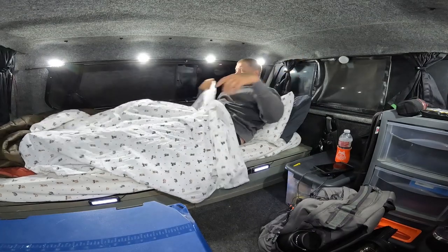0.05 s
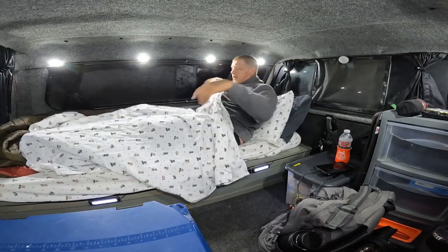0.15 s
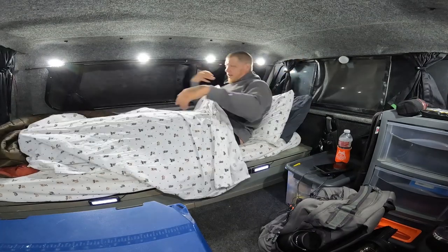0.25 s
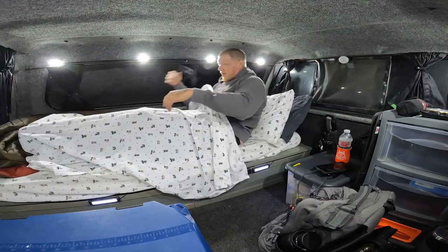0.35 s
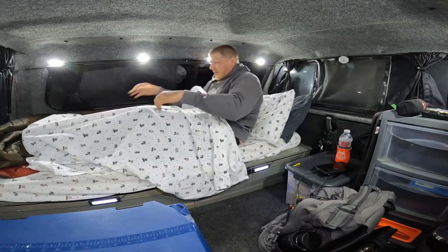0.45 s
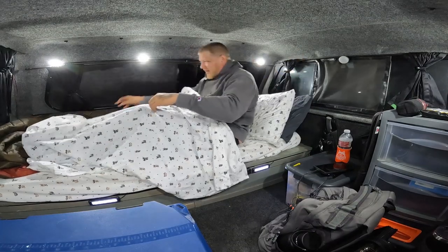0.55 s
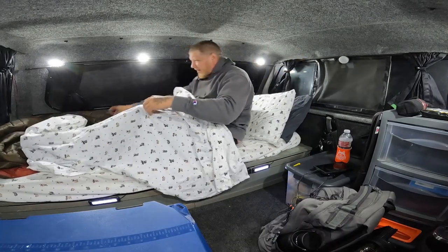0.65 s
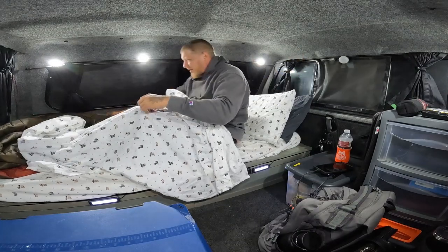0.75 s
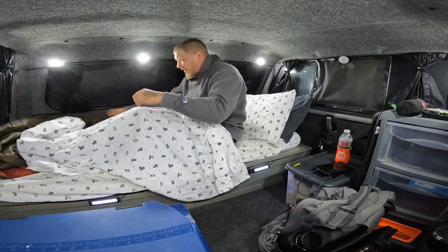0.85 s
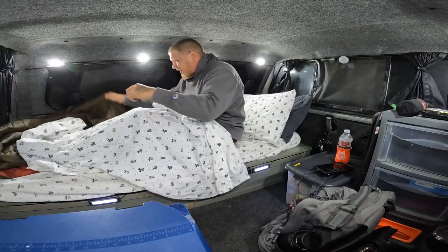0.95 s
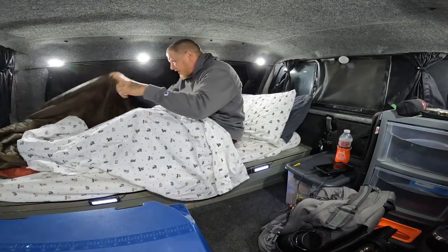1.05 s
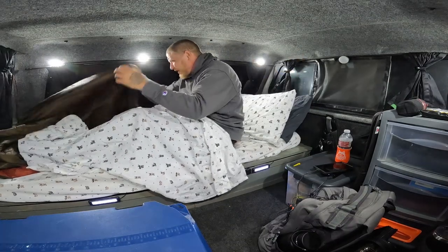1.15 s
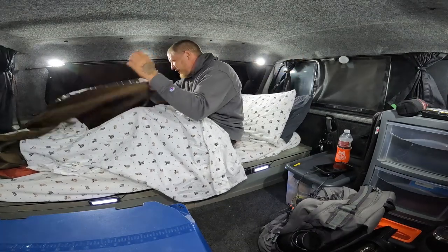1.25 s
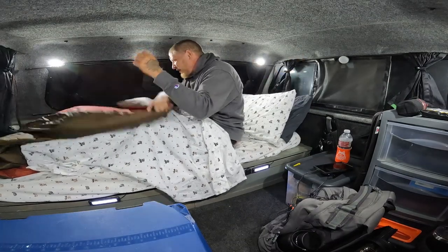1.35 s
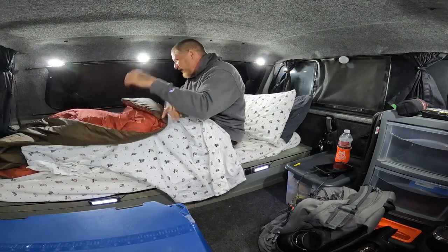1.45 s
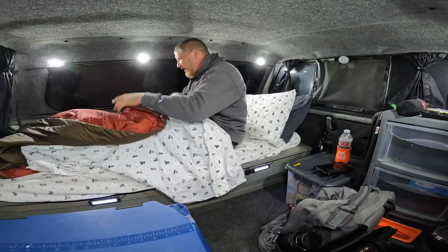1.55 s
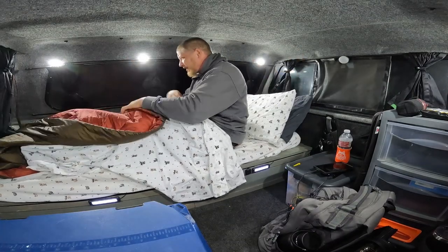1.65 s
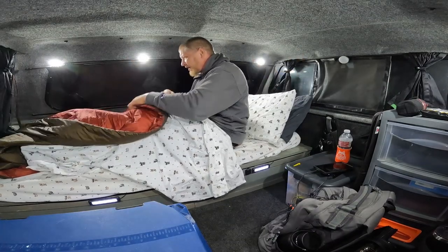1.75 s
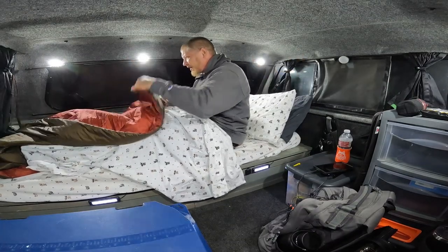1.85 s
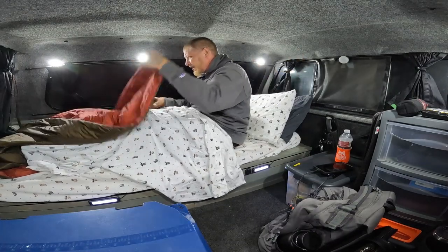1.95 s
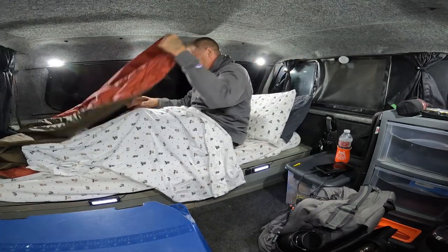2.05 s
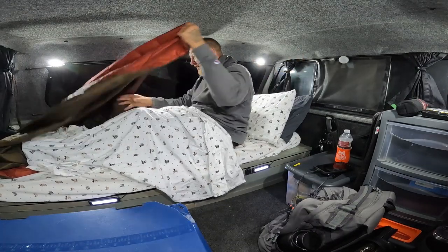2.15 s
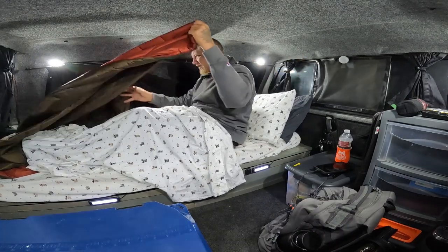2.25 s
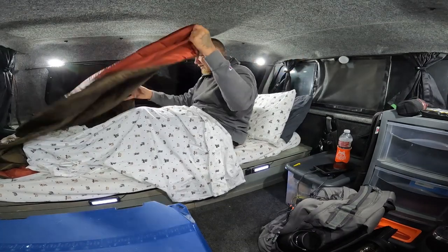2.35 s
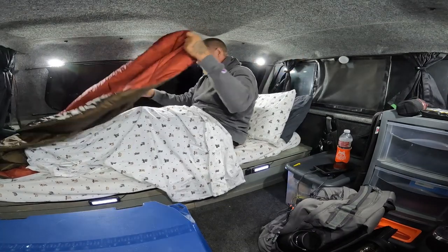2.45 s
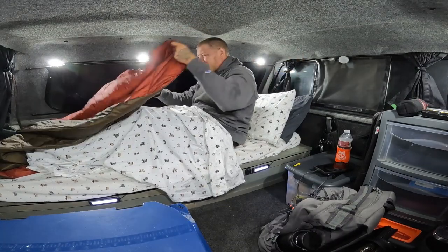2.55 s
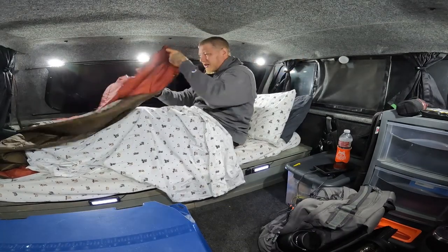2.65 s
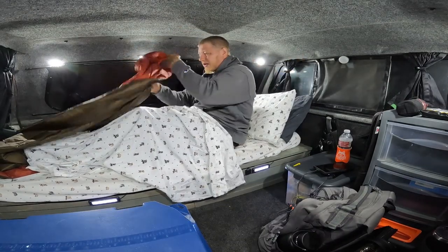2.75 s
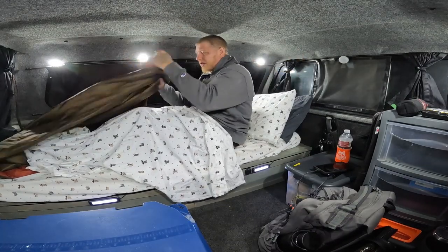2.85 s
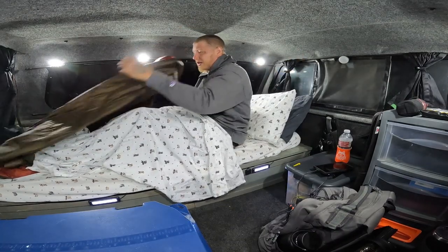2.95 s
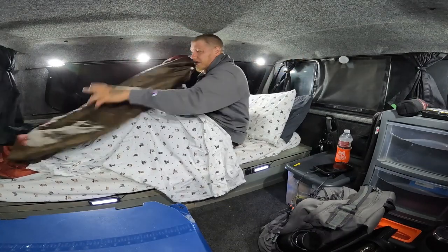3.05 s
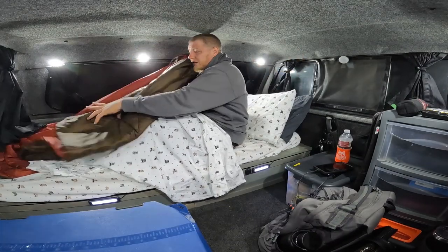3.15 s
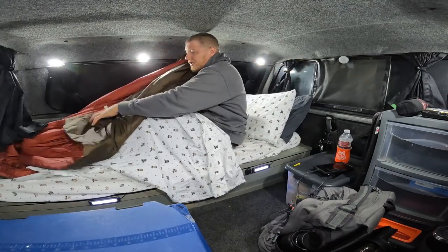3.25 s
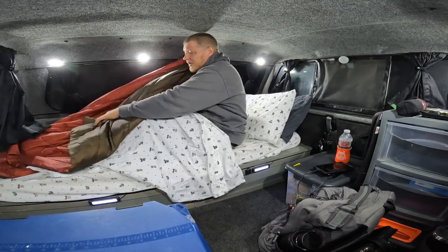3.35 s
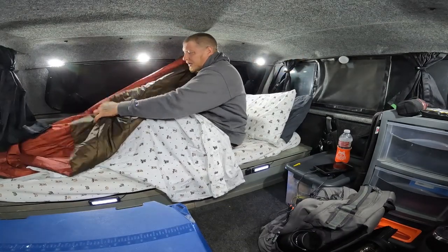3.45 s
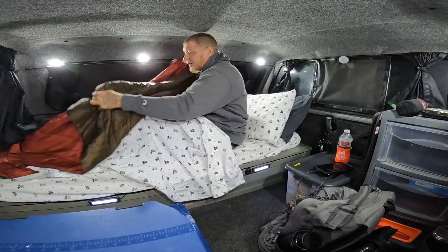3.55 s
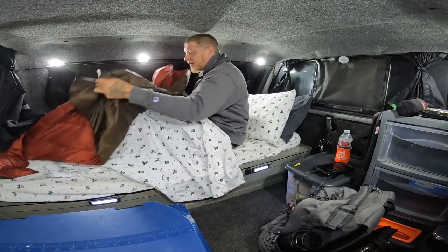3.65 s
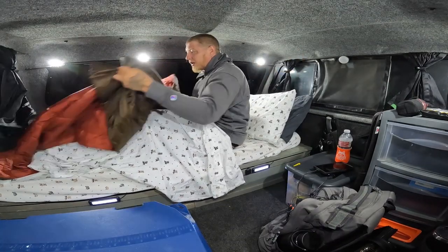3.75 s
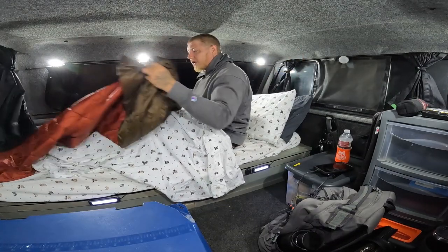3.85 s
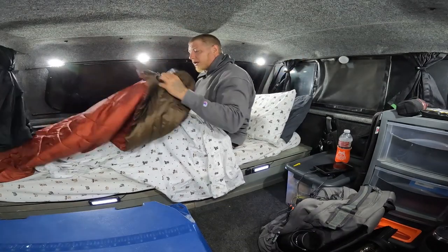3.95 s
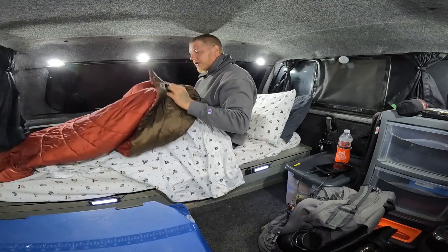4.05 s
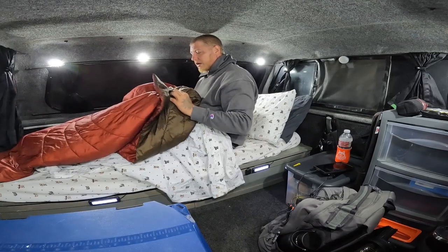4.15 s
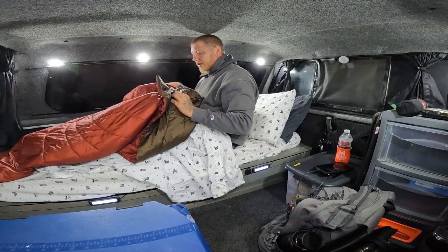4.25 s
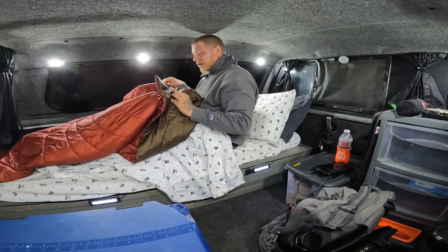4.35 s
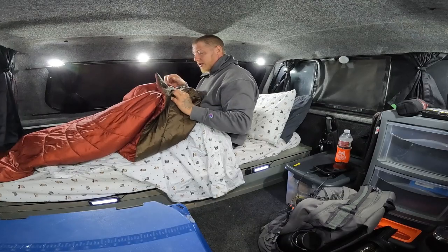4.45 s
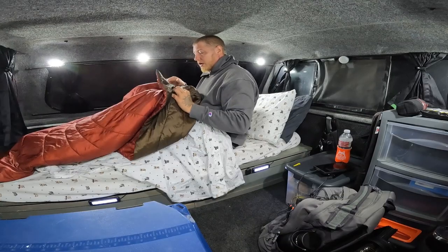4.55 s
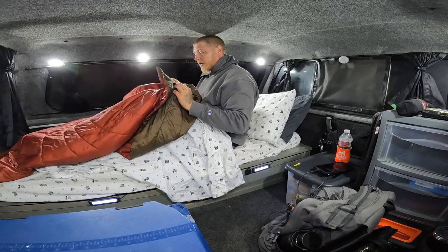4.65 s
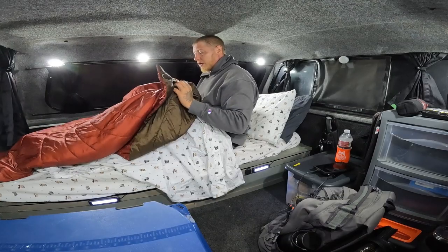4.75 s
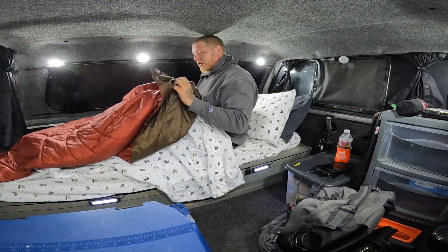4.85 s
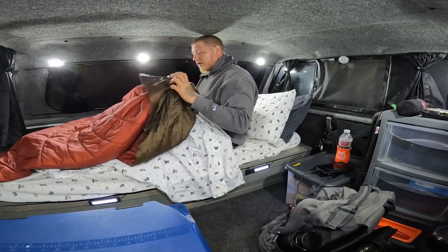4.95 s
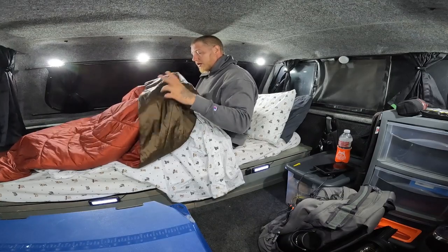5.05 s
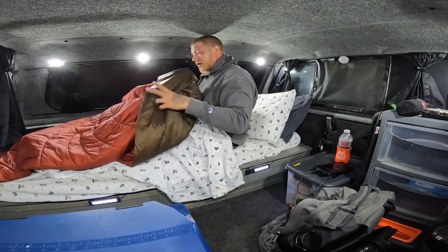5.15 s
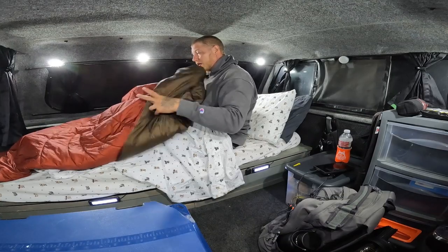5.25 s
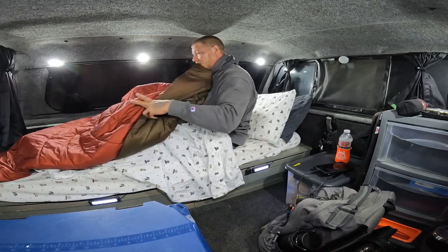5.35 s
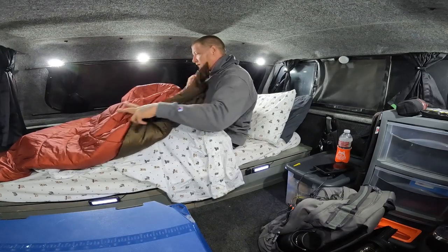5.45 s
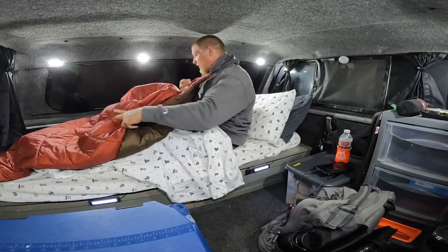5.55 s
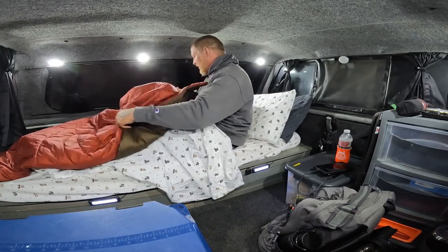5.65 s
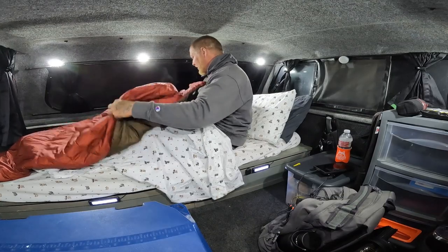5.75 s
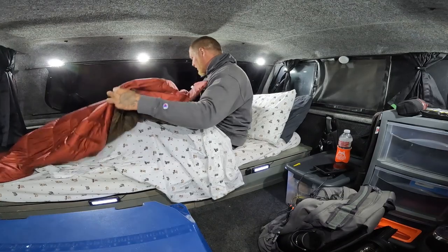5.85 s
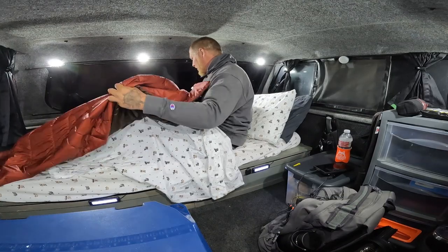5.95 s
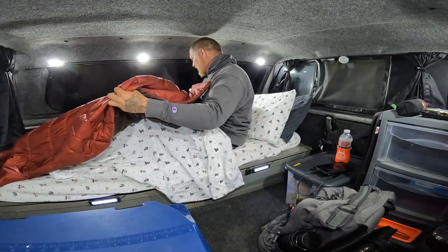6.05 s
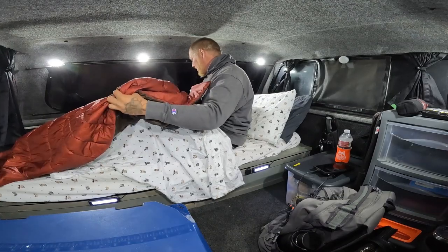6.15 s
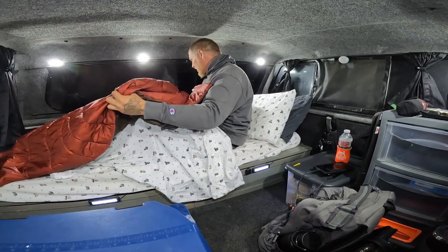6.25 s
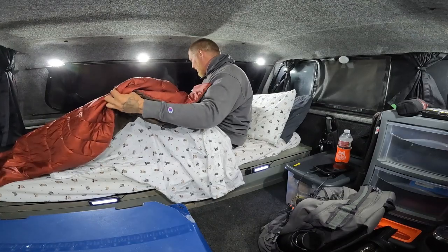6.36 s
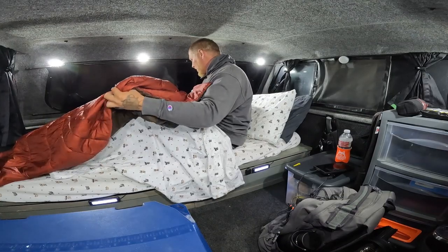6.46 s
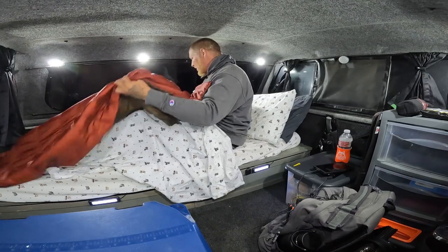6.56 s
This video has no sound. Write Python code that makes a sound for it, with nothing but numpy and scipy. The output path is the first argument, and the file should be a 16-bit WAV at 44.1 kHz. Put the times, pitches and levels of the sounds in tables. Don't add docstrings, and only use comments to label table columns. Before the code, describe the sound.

Slippery bag fabric rustles, snaps and flaps close by, with dull knocks on a wooden bed and low puffs of pushed air, easing then resuming.

```python
import sys
import numpy as np
from scipy import signal
from scipy.fft import rfft, irfft
from scipy.io import wavfile

SR = 44100
rng = np.random.default_rng(int(sys.argv[2]) if len(sys.argv) > 2 else 0)


def gain_from_decibels(decibels):
    exponent = np.asarray(decibels, float) / 20
    return 10 ** exponent


def persist_wave(psi):
    counts = np.round(np.clip(psi, -1, 1) * 32767).astype(np.int16)
    wavfile.write(sys.argv[1], SR, np.atleast_2d(counts).T)


N = 291060


def to_rms_one(x):
    return x / np.sqrt(np.mean(x ** 2) + 1e-20)


def to_peak_one(x):
    return x / np.abs(x).max(axis=1, keepdims=True)


def at_hz(points, hz):
    points_hz, values = np.array(points)[:, 0], np.array(points)[:, 1]
    return np.interp(np.log(hz), np.log(points_hz), values)


def drift(rate):
    r = np.exp(-80 * np.pi * rate / SR)
    slow = signal.lfilter([1], [1, -2 * r, r * r], rng.standard_normal(N // 40 + 2002))[2000:]
    return np.interp(np.arange(N) / 40, np.arange(len(slow)), to_rms_one(slow))


def ring(x, hz, t60):
    r, w = gain_from_decibels(-60 / (t60 * SR)), 2 * np.pi * hz / SR
    return signal.lfilter([0, np.sin(w)], [1, -2 * r * np.cos(w), r * r], x + 1e-18)


def band(x, low_hz, high_hz, order=2):
    sos = signal.butter(order, [low_hz, min(high_hz, .45 * SR)], "band", fs=SR, output="sos")
    return signal.sosfilt(sos, x)


def swells(peak_s, rise_s, fall_s, level_db, curve=2):
    swell_db, rest_db = 12, -88
    t = np.arange(0, N / SR + .003, .003)
    late = t[:, None] - peak_s
    rising, falling = -late / np.maximum(rise_s, .005), late / np.maximum(fall_s, .005)
    shape_db = -swell_db * np.where(late < 0, rising, falling) ** curve
    power = np.sum(gain_from_decibels(2 * np.maximum(level_db + shape_db, -150)), axis=1) + gain_from_decibels(2 * rest_db)
    return np.interp(np.arange(N) / SR, t, 10 * np.log10(power))


# pitch_hz, likeness (1 = the same)
LIKENESS = [(150, .995), (300, 0.97), (600, 0.72), (1200, 0.83), (2400, 0.64), (5000, 0.79), (9000, 0.67),
            (14000, 0.18)]
# pitch_hz, left_minus_right_db
LEAN = [(150, -0.5), (550, 3.5), (1200, 1.8), (2400, 3.5), (5000, 2), (9000, 4.5), (14000, 9)]


def ports(mid, side, hz):
    alike = np.clip(at_hz(LIKENESS, hz), -1, 1)
    lean = gain_from_decibels(at_hz(LEAN, hz) / 2 * np.array([[1], [-1]]))
    return lean * (np.sqrt(1 + alike) * mid + np.sqrt(1 - alike) * side * [[1], [-1]]) / np.sqrt(2)


def coloured(source, spectrum, low_hz, count, moving_db):
    out = 0
    edges = low_hz * 2 ** (np.arange(count + 1) / 3)
    for k, (low, high) in enumerate(zip(edges, edges[1:])):
        hz = np.sqrt(low * high)
        level = gain_from_decibels(at_hz(spectrum, hz) + moving_db(hz))
        out = out + level * ports(*band(source[k % 2], low, high), hz)
    return out


# pitch_hz, level_db (per Hz)
HISS = [(100, 0), (150, 13), (356, 3), (615, -36), (1400, 11), (2600, -5), (6200, 5.5), (12000, -10),
        (14000, -32)]


def cabin_hiss():
    noise = rng.standard_normal((2, 2, N))
    return gain_from_decibels(-69) * to_rms_one(coloured(noise, HISS, 61.0, count=24, moving_db=lambda hz: 0))


# widest_s, dying_s, cabin_breathing_db, shell_flex_db (against the breathing)
SWINGS = [(0.07, 0.17, -40.5, -13), (0.19, 0.38, -65, 14), (0.35, 0.13, -40, -26),
          (0.71, 0.29, -44.5, -25.5), (0.81, 0.32, -61, 11), (0.98, 0.072, -37, -28),
          (1.24, 0.15, -29, -16), (1.392, 0.11, -71.5, 17), (1.53, 0.12, -41, -3.5),
          (1.79, 0.12, -39.5, -2), (1.88, 0.57, -61, -4), (2.2, 0.21, -37, -9), (2.72, 0.06, -59.5, 6),
          (3.04, 0.71, -48, -9), (3.41, 0.11, -39, -1), (3.72, 0.24, -47, 2.5), (3.782, 0.18, -31.5, -29),
          (4.05, 0.083, -40.5, -39), (4.201, 0.3, -64.5, -8), (4.75, 0.24, -57.9, -11.5),
          (4.86, 0.063, -54.5, -6), (5.09, 0.096, -52, -18), (5.36, 0.16, -47, -9), (5.55, 0.14, -74, 17),
          (5.74, 0.15, -46.5, 8.5), (5.88, 0.37, -50.5, -6), (6.36, 0.1, -52.5, -7), (6.58, 0.06, -63, -51)]
SWING_RISE = 0.63


def rumble():
    s, dying_s, db, _ = np.transpose(SWINGS)
    level = gain_from_decibels(swells(s, SWING_RISE * dying_s, 1.22 * dying_s, db - 10)) + gain_from_decibels(-75)
    return level * to_rms_one(band(rng.standard_normal(N), 24.6, 38.2))


def pumped_air(breathing_hz=19.43, flex_hz=41, wander=0.071, rough_db=0.5):
    out = 0
    s, dying_s, db, flex_db = np.transpose(SWINGS)
    for hz, peak_db in ((breathing_hz, db + 2.0), (flex_hz, db + flex_db)):
        level_db = swells(s, SWING_RISE * dying_s, dying_s, peak_db)
        turns = np.cumsum(hz * (1 + wander * drift(2.76))) / SR
        out = out + gain_from_decibels(level_db + 1.5 + rough_db * drift(18)) * np.sin(2 * np.pi * turns)
    return out


# heaviest_s, settling_s, mattress_db, frame_db (against the mattress)
HEAVES = [(0.07, 0.91, -48, -8.5), (0.16, 0.22, -53.5, 16), (0.51, 0.16, -57, 3), (0.91, 0.25, -58.5, 3),
          (1.181, 0.3, -45, -5.5), (1.29, 0.071, -56.5, 7.5), (1.74, 0.078, -55.5, 10.5),
          (1.48, 0.15, -53, -7), (1.789, 0.09, -41.5, -8), (2.06, 0.09, -42, -5.5), (2.15, 0.2, -54, 1),
          (2.22, 0.18, -49, -9), (2.55, 0.25, -59, -8.5), (2.68, 0.11, -59.5, 2), (2.8, 0.27, -50, -11),
          (3.13, 0.41, -47, -7.5), (3.261, 0.052, -50, 7.5), (3.41, 0.051, -45.8, 1.5),
          (3.73, 0.32, -44, -5.5), (3.52, 0.074, -63.5, 10), (3.88, 0.1, -59, 6.5),
          (4.02, 0.35, -58, -10.5), (4.25, 0.05, -76, -4), (4.56, 0.05, -77, 6), (4.73, 0.2, -67, -13),
          (4.85, 0.43, -65.5, -7), (5.159, 0.061, -60, 0), (5.38, 0.34, -59.5, -9), (5.59, 0.4, -54, -16.5),
          (5.73, 0.076, -48.5, 6.5), (6.0, 0.1, -51, -2), (6.16, 0.072, -52.5, -3), (6.38, 0.34, -66, -7.5),
          (6.48, 0.057, -62.5, -9), (6.7, 0.36, -57.5, -14.5)]
# start_s, snap_db, thud_db, tick_db, thud_depth_db
PATS = [(0.108, -53, -48, -58, 8), (0.397, -37, -31.5, -54.5, 1), (0.510, -50, -39, -66, 1),
        (0.557, -48, -55, -61, 3), (0.592, -56, -51, -57, -3), (0.734, -34, -28, -48.5, 3.5),
        (0.931, -52, -45.5, -67, 0), (1.5504, -19.5, -20.5, -29.5, 1), (1.69, -42, -42, -44.5, 4),
        (1.816, -35, -51, -60, 4), (1.967, -36.5, -35, -49, -12), (2.193, -38.5, -41, -47, 1),
        (2.257, -39.5, -43, -56, 0), (3.411, -33, -46, -44, 5), (3.725, -42, -53, -51, 3),
        (5.149, -57, -54, -51, 7), (5.322, -58, -54.5, -67, -2), (5.894, -33, -28, -57, -6),
        (6.164, -72, -51, -68, -2)]


def heaves(offset_db=0, per_db=0):
    rows = [(s, 0.43 * settle_s, settle_s, db, frame_db) for s, settle_s, db, frame_db in HEAVES]
    for start_s, _, thud_db, _, depth_db in PATS:
        rows.append((start_s + 0.0065, .008, 0.074, thud_db - 12.5, 1 + depth_db))
    s, rise_s, settle_s, db, frame_db = np.transpose(rows)
    return swells(s, rise_s, settle_s, db + offset_db + per_db * frame_db, curve=1.24)


# pitch_hz, level_db, t60_s
BED = [(126, -6, 0.1), (146.7, -8.5, 0.14), (177.7, 0.5, 0.19), (206.5, -13, 0.17), (250.5, -2, 0.079),
       (297.2, 0.5, 0.12), (341.7, -7, 0.16), (412.5, 2, 0.055), (473, -8, 0.023), (562, -11, 0.082)]


def bed(lumpy_db=2.36):
    mattress_db, frame_db = heaves(), heaves(per_db=1)
    press = rng.standard_normal((2, N)) * gain_from_decibels(lumpy_db * drift(9.8))
    body = 0
    for k, (hz, db, t60) in enumerate(BED):
        body = body + gain_from_decibels(db) * ring(press, hz, 0.24 * t60) * (-1) ** k
    body = to_rms_one(band(body, 77, 780))
    flex = to_rms_one(band(rng.standard_normal((2, N)), 47.0, 118)) * gain_from_decibels(lumpy_db * drift(4.5))
    return ports(*(gain_from_decibels(mattress_db) * body), 300) + gain_from_decibels(frame_db + 0.5) * flex[0]


# start_s, snap_db, tick_db, pitch_hz
SNAPS = [(0.715, -46, -75, 1130), (1.164, -44, -42.5, 2350), (1.2192, -34, -48, 1900),
         (1.244, -42, -46, 1070), (1.346, -68, -59, 2190), (1.452, -40, -57, 1370),
         (1.787, -36.5, -54.5, 970), (2.024, -44, -51, 916), (2.0745, -30, -52, 1620),
         (2.086, -33.5, -63, 1440), (2.812, -33, -45, 1253), (2.976, -38, -48, 2160),
         (3.053, -48.5, -77.5, 2230), (3.301, -38.5, -44, 1780), (3.665, -38.5, -44, 1710),
         (3.905, -38, -55, 1800), (4.032, -39.5, -54.5, 1370), (5.294, -46, -60, 1270),
         (5.575, -35.5, -56, 810), (5.705, -31, -48.5, 1236), (5.81, -53, -43.5, 1670),
         (5.941, -36.5, -69, 1326), (6.198, -52, -65, 1820)]
# pitch_hz, level_db, t60_s
CABIN = [(760, -8.5, 0.054), (1236, -1, 0.031), (1370, -4, 0.031), (1710, -10, 0.052), (1910, -8, 0.034),
         (2194, -7.5, 0.037), (2790, -12, 0.032)]


def pats_and_snaps(contact_s=0.01, thud_lag_s=-0.002, spread_s=0.004, tick_t60=0.036, snap_t60=0.033,
                   scuff_db=-4.5):
    out, t = np.zeros((2, N + SR)), np.arange(int(.25 * SR)) / SR

    def strike(own, modes, lag_s, vary_db, lag_cycles=0, press_s=1e-4):
        total = 0
        for hz, db, t60 in modes:
            start_s = lag_s + lag_cycles / hz + spread_s * own.random((2, 1))
            since = np.maximum(t - start_s, 0)
            level = own.choice([-1, 1]) * gain_from_decibels(db + own.normal(0, vary_db) - 60 * since / t60)
            total = total + level * np.sin(2 * np.pi * hz * since) * np.minimum(since / press_s, 1)
        return to_peak_one(total)

    hands = [(s, db, thud, tick, 1190, deep) for s, db, thud, tick, deep in PATS]
    folds = [(s, db, db - 11.5, tick, hz, -3.5) for s, db, tick, hz in SNAPS]
    for s, snap_db, thud_db, tick_db, hz, depth_db in sorted(hands + folds):
        own = np.random.default_rng(rng.integers(2 ** 31))
        noise = own.standard_normal((2, 2, len(t)))
        tick = band(noise[0] * gain_from_decibels(-60 * t / tick_t60) * np.minimum(t / 0.0032, 1), 1800, 8200)
        scuff = band(noise[1] * np.exp(-t / contact_s), 810, 1890)
        snap = strike(own, CABIN + [(hz, 1.5, snap_t60)], 0, vary_db=3.0)
        snap = snap + gain_from_decibels(scuff_db) * scuff / np.abs(scuff).max()
        bed_modes = [(f, db + (depth_db - 2.5) * (f < 225), t60) for f, db, t60 in BED]
        thud = strike(own, bed_modes, thud_lag_s, vary_db=1.0, lag_cycles=0.78, press_s=0.0039)
        thud = band(thud, 130, 1500)
        i = round((s - .0025) * SR)
        layers = [(tick, tick_db + 9.5, 5000), (snap, snap_db, 1200), (thud, thud_db + 3.5, 200)]
        for x, db, centre_hz in layers:
            out[:, i:i + len(t)] += gain_from_decibels(db) * ports(*to_peak_one(x), centre_hz)
    return out[:, :N]


# start_s, peak_db, centre_hz
CRACKS = [(0.396, -32, 1230), (0.509, -46, 1180), (0.735, -33, 1160), (1.217, -30, 1870),
          (2.072, -29, 1623), (2.084, -34, 1800), (2.37, -40, 1250), (2.815, -36, 1220), (3.054, -43, 2270),
          (3.26, -29, 1800), (3.392, -32.5, 1940), (3.411, -23.5, 1150), (3.724, -30, 1990),
          (5.704, -29, 1230), (5.892, -29, 1180), (5.938, -29, 1350)]


def cracks(t60=0.023, octaves=0.9, offset_db=-4.0):
    out, t = np.zeros((2, N + SR)), np.arange(2000) / SR
    for s, db, hz in CRACKS:
        noise = rng.standard_normal((2, len(t)))
        burst = band(noise * gain_from_decibels(-60 * t / t60), hz / 2 ** octaves, hz * 2 ** octaves, order=1)
        i = round(s * SR)
        out[:, i:i + len(t)] += gain_from_decibels(db + offset_db) * ports(*to_peak_one(burst), hz)
    return out[:, :N]


# start_s, length_s,
# pitch_hz, level_db
WHISTLES = [(2.985, 0.045, 2245, -44), (3.035, 0.04, 2290, -50), (3.07, 0.076, 2300, -49),
            (3.251, 0.026, 1762, -53), (2.91, 0.16, 2270, -51), (5.561, 0.02, 800, -43),
            (5.569, 0.018, 646, -42.5), (5.702, 0.014, 3080, -42), (5.816, 0.028, 1653, -49),
            (6.185, 0.031, 1810, -47.5), (6.215, 0.063, 1840, -58)]


def whistles(ring_s=0.08):
    out = np.zeros((2, N))
    for s, length_s, hz, db in WHISTLES:
        i, n = round(s * SR), round(length_s * SR)
        tone = ring(ring(rng.standard_normal((2, 9000)), hz, ring_s), hz, ring_s)
        tone = tone[:, 1000:1000 + n]
        out[:, i:i + n] += gain_from_decibels(db) * np.hanning(n) * ports(*to_rms_one(tone), hz)
    return out


# widest_s, dying_s, level_db
FLAPS = [(2.62, .06, -76), (2.82, .05, -68), (3.15, .12, -67), (3.33, 0.13, -66), (3.75, .1, -69),
         (4.05, .06, -74), (5.45, .1, -71), (5.64, .05, -69), (5.75, .08, -70), (5.95, .1, -72),
         (1.62, .06, -70), (4.75, .1, -80), (2.24, .05, -70)]


def flapping():
    shifts_db = heaves(offset_db=-22, per_db=-1.23)
    s, dying_s, db = np.transpose(FLAPS)
    corners_db = swells(s, 0.67 * dying_s, dying_s, db)
    return 10 * np.log10(gain_from_decibels(2 * shifts_db) + gain_from_decibels(2 * corners_db))


# fastest_s, speed_up_s, slow_down_s, level_db, lightness_db
STROKES = [(0.11, 0.48, 0.27, -51, -1.2), (0.32, 0.06, 0.65, -64.5, -5.5), (0.6, 0.41, 0.12, -67, 7),
           (0.909, 0.16, 0.2, -52, 1.2), (1.163, 0.12, 0.31, -50, -1.2), (1.26, 0.18, 0.088, -55.5, 5.5),
           (1.38, 0.032, 0.0049, -45.5, 4), (1.458, 0.16, 0.22, -50.5, 1), (1.821, 0.13, 0.12, -48, 1.7),
           (2.014, 0.086, 0.68, -52.5, -0.5), (2.29, 0.092, 0.063, -50.5, 5),
           (2.851, 0.29, 0.12, -48.5, 0.6), (2.99, 0.063, 0.82, -50.5, 0.8), (3.25, 0.014, 0.23, -48.6, 3),
           (3.43, 0.15, 0.059, -48, 1.5), (3.707, 0.15, 0.29, -48, 0.9), (4.3, 1.8, 0.1, -57, 0),
           (4.6, 0.089, 0.082, -68, -2.5), (3.76, 0.11, 0.078, -50, 3), (2.065, 0.015, 0.03, -55, -10),
           (5.73, 0.02, 0.04, -54, -4), (5.55, 0.084, 0.09, -58, -4), (3.4, 0.046, 0.056, -56, 3.5),
           (2, 0.054, 0.053, -56, 4.5), (5.86, 0.028, 0.03, -60, 0), (2.79, 0.057, 0.045, -52, -1.5),
           (5.65, 0.034, 0.04, -54.5, -5), (4.73, 0.11, 0.36, -53.5, 2.1), (4.98, 0.11, 0.97, -59, 2),
           (5.46, 0.22, 0.38, -50, 6), (5.83, 0.65, 0.026, -50.5, 0.4), (5.91, 0.054, 0.35, -51.5, -0.2),
           (6.18, 0.027, 0.42, -58.5, -0.1), (6.652, 0.13, 1.0, -49.5, 2)]
# fastest_s, dying_s, level_db, lightness_db
FLICKS = [(1.697, 0.023, -58, 8.5), (2.07, 0.037, -53.5, -8.5), (2.81, .07, -48, -2.5),
          (3.1, 0.066, -53.5, -3.5), (3.7, 0.08, -51, 2), (4.02, 0.32, -53.5, 0.5),
          (4.44, 0.033, -74.5, 5.5), (2.55, .2, -78, -2), (5.163, 0.023, -52.5, 2),
          (5.72, 0.037, -49, -3.5), (6.195, 0.053, -55, 4)]
# pitch_hz, level_db (per Hz)
NYLON = [(500, -2.5), (800, -3.5), (1000, -2.5), (1200, 1.4), (1500, 2), (2200, 1.5), (2600, -0.5),
         (3500, 0.5), (6000, -1.5), (8000, -4), (15000, -7)]


def fabric(crinkles_per_s=1800, spread_db=6.0, crinkle_db=-4.5, patchy_db=1.24, catch_db=0.83):
    flicks = [(s, 0.33 * dying_s, dying_s, db, light_db) for s, dying_s, db, light_db in FLICKS]
    s, rise_s, fall_s, db, light_db = np.transpose(list(STROKES) + flicks)
    slide_db = swells(s, rise_s, fall_s, db, curve=2.18)
    coarse_db = swells(s, rise_s, fall_s, db - light_db, curve=2.18) - slide_db
    sheen_db = swells(s, rise_s, fall_s, db + 1.39 * light_db, curve=2.18) - slide_db
    flap_db = flapping() - slide_db
    catches = drift(25)
    born = rng.random((2, N)) < crinkles_per_s * gain_from_decibels(3.0 * catches) / SR
    sizes = gain_from_decibels(spread_db * np.minimum(rng.exponential(1, (2, N)), 5))
    crinkles = born * sizes * rng.choice([-1, 1], (2, N))
    source = rng.standard_normal((2, 2, N)) + gain_from_decibels(crinkle_db) * to_rms_one(crinkles)

    def moving_db(hz):
        if hz < 1020:
            return flap_db + 13.0 + patchy_db * drift(23)
        coarse = np.clip(np.log2(3000 / hz) / 0.55, 0, 1)
        sheen = np.clip(np.log2(hz / 3400) / 0.9, 0, 1)
        tilt = coarse * (coarse_db - np.median(coarse_db)) + sheen * (sheen_db - np.median(sheen_db))
        if hz > 12000:
            tilt = tilt + 0.18 * (slide_db - np.median(slide_db))
        return tilt + catch_db * catches + 0.6 * patchy_db * drift(5.0)

    cloth = coloured(source, NYLON, 542.0, count=15, moving_db=moving_db)
    return gain_from_decibels(slide_db + 6.0) * to_rms_one(cloth)


def scene():
    air = cabin_hiss() + rumble() + pumped_air()
    return air + bed() + pats_and_snaps() + cracks() + whistles() + fabric()


def roll_off(x):
    return signal.sosfilt(signal.butter(12, 15620, fs=SR, output="sos"), x)


# pitch_hz, level_db
MIC = [(7700, -0.5), (8200, -5), (9500, -6), (10000, -10.5), (10900, -11), (11700, -7.5), (12600, -12.5),
       (12900, -16), (14200, -22.5), (15600, -29), (16000, -72)]


def record(dry):
    hz = np.maximum(np.fft.rfftfreq(N, 1 / SR), 1)
    mix = irfft(rfft(dry) * gain_from_decibels(at_hz(MIC, hz)), N)
    return roll_off(mix)


dry = scene()
out = record(dry)
persist_wave(out)
```